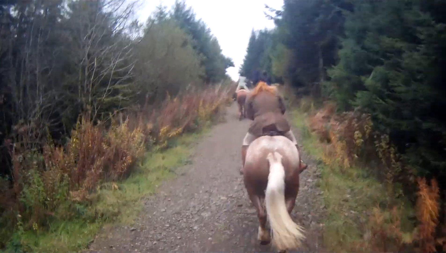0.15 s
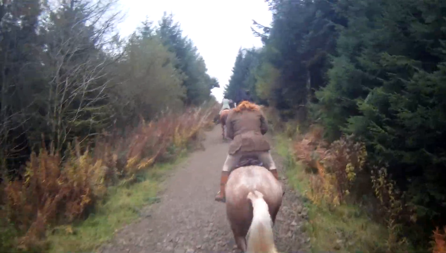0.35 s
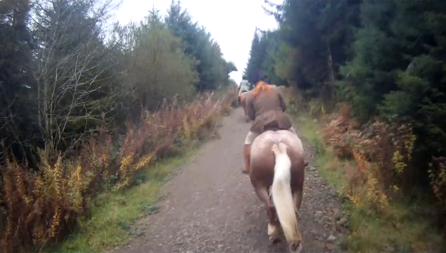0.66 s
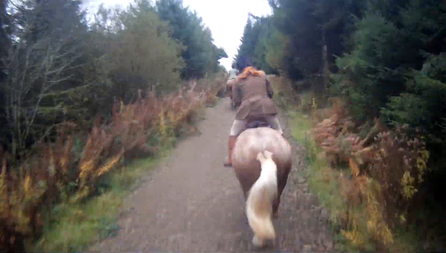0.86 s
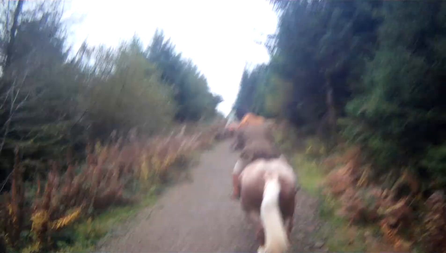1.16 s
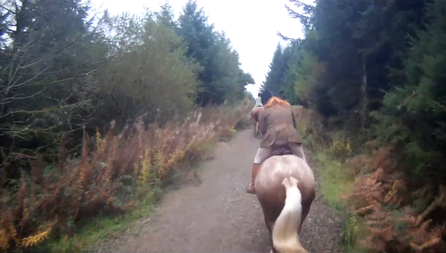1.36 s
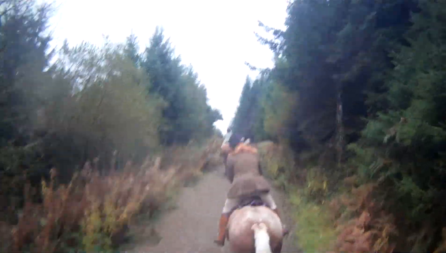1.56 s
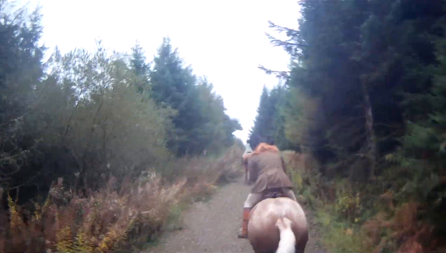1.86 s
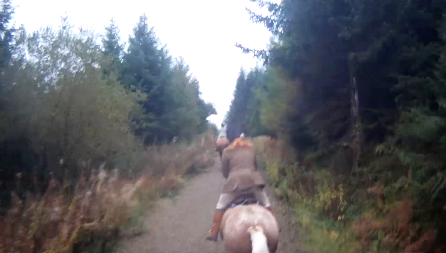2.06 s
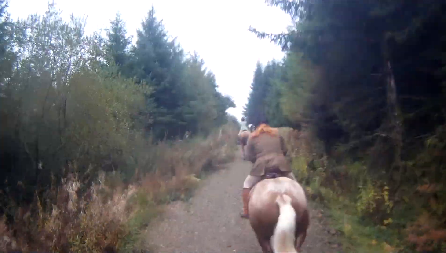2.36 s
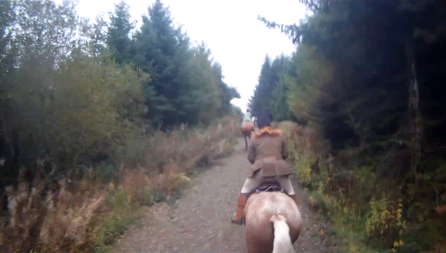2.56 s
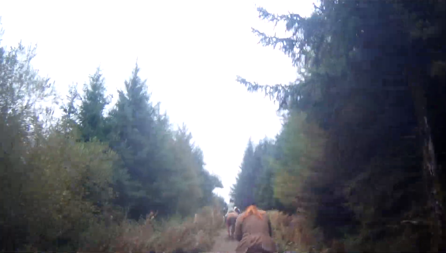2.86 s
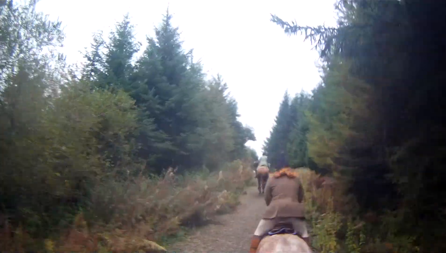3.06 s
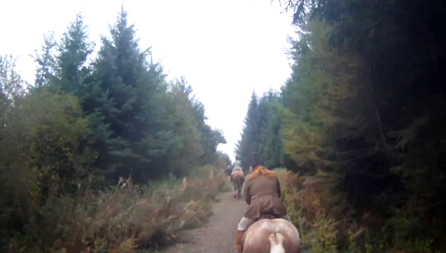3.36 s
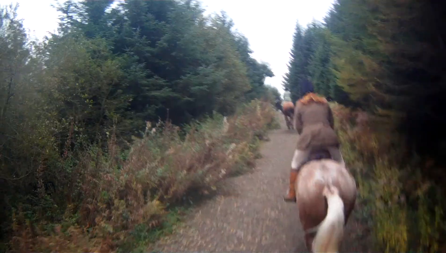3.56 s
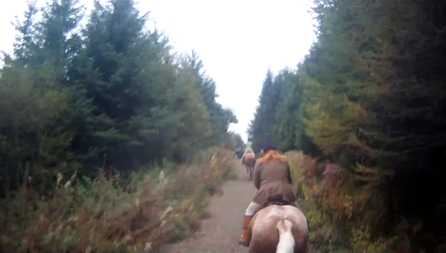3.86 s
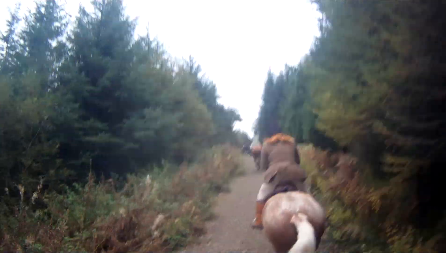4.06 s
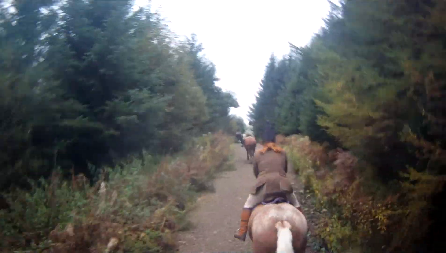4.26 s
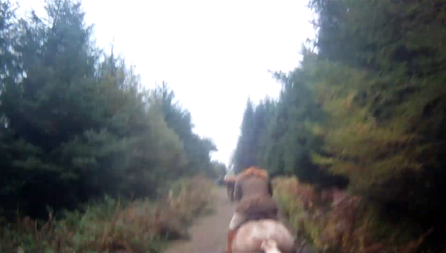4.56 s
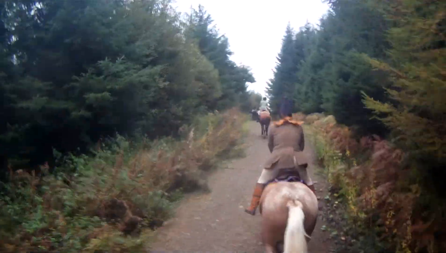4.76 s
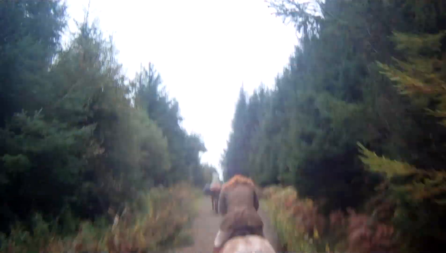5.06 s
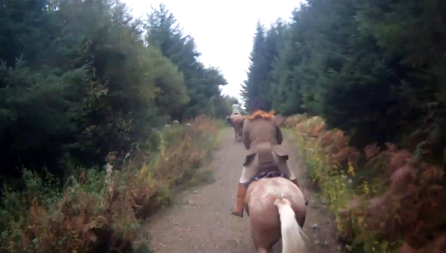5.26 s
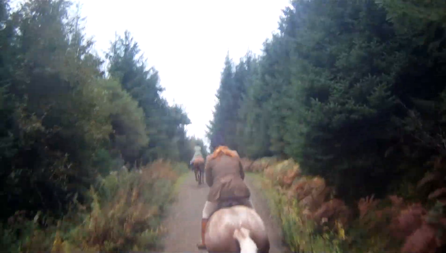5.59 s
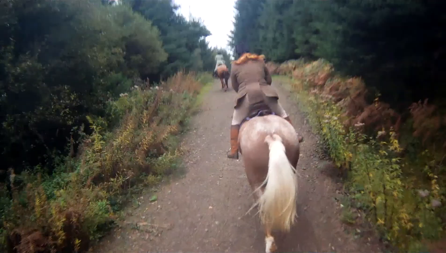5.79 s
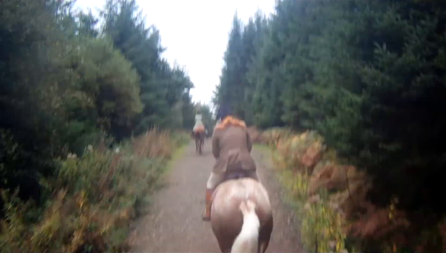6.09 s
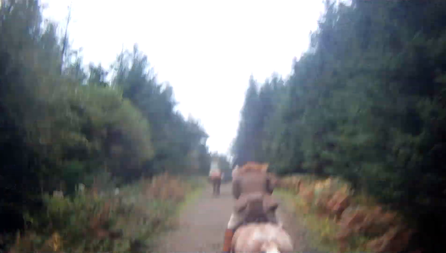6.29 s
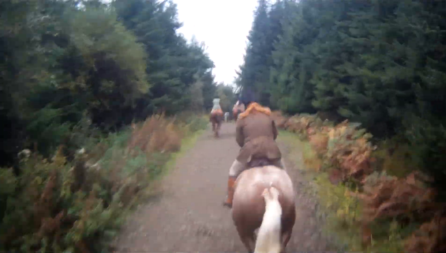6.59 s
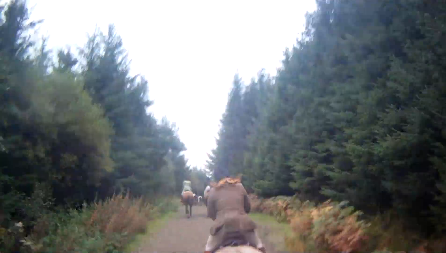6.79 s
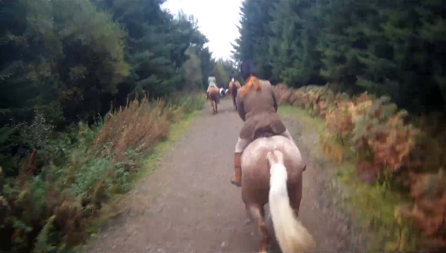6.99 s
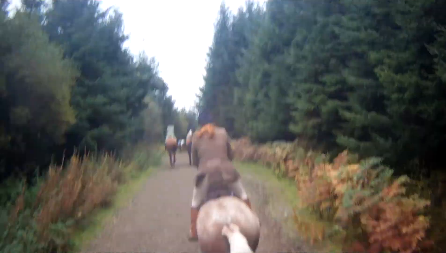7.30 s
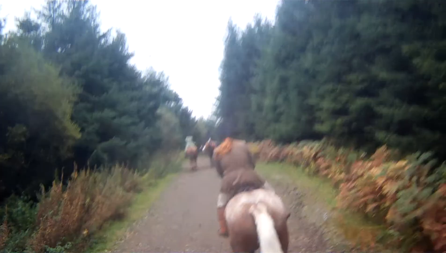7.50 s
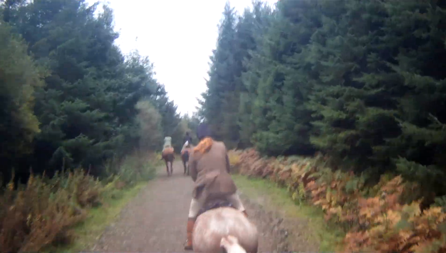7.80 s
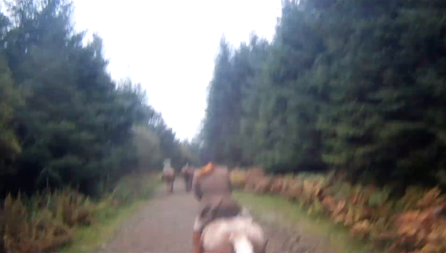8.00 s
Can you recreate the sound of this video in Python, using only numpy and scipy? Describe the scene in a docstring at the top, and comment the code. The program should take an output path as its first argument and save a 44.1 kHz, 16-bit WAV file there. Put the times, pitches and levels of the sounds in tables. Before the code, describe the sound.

Several horses canter on a gravel forest track. Hooves crunch in a dense, continuous, irregular run, each with a sharp snap and short spray of grit, some with a hollow clop. Loose stones hiss underneath. Dull thumps and small plastic rattles come from the microphone's case on a rider's helmet. Outdoors, dry, slightly boxy, with barely any wind.

```python
"""Horses canter along a gravel forest track, heard by one microphone in a plastic case on a rider's helmet.
Each hoof shapes random stone clicks by a snap, a burst and a weak tail; loose gravel hisses and spatters
between. Parallel resonances of the case colour both. The jolts of the stride excite damped modes of the
case on its mount, with a rattle of small touches. Band-limited noise gives a faint wind rumble and rustle."""
import sys
import numpy as np
from scipy import signal
from scipy.io import wavfile

SR = 44100
rng = np.random.default_rng(int(sys.argv[2]) if len(sys.argv) > 2 else 0)


def wrap_up_sound(samples):
    """Save the sound to the file named by the first command line argument, as 16-bit audio."""
    columns = np.atleast_2d(samples).T
    # keep every value between -1 and 1, then stretch to whole-number steps
    tamed = np.clip(columns, -1, 1)
    steps = np.round(tamed * 32767).astype(np.int16)
    wavfile.write(sys.argv[1], SR, steps)


N = 358974   # length in samples


def amp(db):
    """Level to amplitude: 20 dB is a factor of ten."""
    return 10 ** (np.asarray(db) / 20)


def rms_one(x):
    """Normalisation to unit effective value."""
    return x / np.sqrt(np.mean(x ** 2) + 1e-20)


def drift(rate):
    """Low-passed noise: a random wander of rms 1, with two equal poles at rate Hz."""
    step = 40   # samples between computed points
    r = np.exp(-2 * np.pi * rate * step / SR)
    noise = rng.standard_normal(N // step + 2002)
    slow = signal.lfilter([1], [1, -2 * r, r * r], noise)[2000:]   # drop the settling
    return np.interp(np.arange(N) / step, np.arange(len(slow)), rms_one(slow))


def resonance(x, hz, width_hz):
    """Forced resonance: a two-pole band with gain near 1 at its peak."""
    r = np.exp(-np.pi * width_hz / SR)
    zeros = (1 - r * r) / 2 * np.array([1, 0, -1])
    return signal.lfilter(zeros, [1, -2 * r * np.cos(2 * np.pi * hz / SR), r * r], x)


def ring(clicks, hz, t60):
    """Free damped vibration: a unit click starts a sine of initial height 1 that decays 60 dB in t60 s."""
    r, w = amp(-60 / (t60 * SR)), 2 * np.pi * hz / SR
    return signal.lfilter([0, np.sin(w)], [1, -2 * r * np.cos(w), r * r], clicks + 1e-18)


def stones(per_s, spread_db):
    """Random impulse process: clicks at random instants, a few much louder than the rest; rms 1."""
    sizes = amp(spread_db * np.minimum(rng.exponential(1, N), 5)) * rng.choice([-1, 1], N)
    return rms_one(sizes * (rng.random(N) < per_s / SR))


# course of the rustle, which the wind follows too: t/s, level/dB
RUSTLE_COURSE = [(0.0, -70), (1.7, -68), (1.92, -64), (6.35, -64.5), (6.55, -61), (8.14, -61.5)]


def rustle_level():
    """Piecewise-linear level: the background is interpolated in dB between the listed times."""
    return np.interp(np.arange(N) / SR, *np.transpose(RUSTLE_COURSE))


# edges of the rustle band: lower f/Hz, upper f/Hz
RUSTLE_BAND_HZ = (31, 430)


def air(level_db):
    """Band-limited impulse noise: sparse clicks through a low band make a faint, uneven rustle."""
    band = signal.butter(2, RUSTLE_BAND_HZ, "band", fs=SR, output="sos")
    rustle = signal.sosfilt(band, stones(1500, spread_db=4.5))
    return amp(level_db + 2.2 * drift(6.2)) * rms_one(rustle)


WIND_DB = -7   # re the rustle


def wind(level_db, top_hz=55.6):
    """Pressure fluctuation on the microphone port: narrow low noise with a lumpy level."""
    band = signal.butter(2, [30, top_hz], "band", fs=SR, output="sos")
    low = signal.sosfilt(band, rng.standard_normal(N))
    return amp(level_db + WIND_DB + 5.1 * drift(12.0)) * rms_one(low)


# knocks of the case on its mount: t/s, body level/dB, click level/dB re body, rattle level/dB re body
CASE_KNOCKS = [(0.179, -49.5, -9, -2.5), (0.262, -38.5, -5, -16), (0.483, -56, -12, -6),
               (0.776, -29.5, 7, -11.5), (0.997, -58, -14, -6), (1.334, -32, 3.5, -10), (1.914, -55, 2, -3),
               (1.966, -51, -23, -15), (2.085, -52, -12, 6), (2.126, -42.5, 13, -6),
               (2.136, -28.5, -2, -14), (2.475, -43.5, -10, -8.5), (2.655, -44.5, -2, -14),
               (2.727, -33.5, 0.5, -8), (2.94, -56, 8, -12), (3.128, -27, 10, -15.5), (3.236, -45, 3, 0),
               (3.307, -25.5, 12.5, -13), (3.627, -32.5, 7.5, -10.5), (3.789, -50, 2, -6),
               (3.825, -48, 5, -9), (3.859, -48, 2, 1.5), (4.243, -41, -5, -4), (4.36, -33.5, 8.5, -6.5),
               (4.4391, -30, 16, -12.5), (4.455, -36, -6, -14), (4.477, -44.5, 4, -3.5),
               (4.787, -45.5, -3, -8.5), (4.948, -53, -17, -14), (5.008, -36, -2, -15.5),
               (5.274, -57, 4, 2), (5.367, -28.5, 9, -13), (5.55, -58, -15, -17), (5.895, -31.5, 8, -15.5),
               (6.37, -58, -10, -6), (6.533, -35.5, 6.5, -8), (6.655, -52, -17, -2), (6.718, -30.5, -3, -9),
               (6.969, -48, 14.5, -5), (7.0424, -28.5, 13.5, -14.5), (7.263, -56, -4, 3),
               (7.654, -40.5, -20, -3), (7.855, -55, -1, -5)]
# modes of the case on its mount: f/Hz, level/dB, t60/s
MOUNT_MODES = [(40.3, -0.5, 0.46), (101.6, 17.5, 0.13), (265, 7.5, 0.03), (426.3, 6.5, 0.037),
               (776, 4.5, 0.032), (897, -1.5, 0.034), (1077, -0.5, 0.029), (1280, 5.5, 0.013),
               (1574, 7.5, 0.013), (2540, 4.5, 0.01), (3150, 8, 0.0051)]
# parts of the push, one f/Hz each: sway, boom, body from, body to, click, crack
PUSH_HZ = (42, 99, 245, 442, 1575, 2650)
SWAY_DB, SWAY_PER_RATTLE = 8.5, 2.4   # a loose, rattling case also sways
# the boom grows more slowly than the knock; a tight case booms more
BOOM_DB, BOOM_PER_BODY, BOOM_PER_RATTLE = -29.5, -0.31, -0.31
UNEVEN_DB, UNEVEN_PER_RATTLE = 8, 0.25   # a tight case rings less unevenly than a loose one
CRACK_DB = -8.5   # re click


def knocks(rattle_s=0.013, lag_s=0.0035):
    """Modal excitation: a short push strikes every mode of the mount, amid small touches as the case shakes."""
    s, level_db, click_db, rattle_db = np.transpose(CASE_KNOCKS)
    sway_db = SWAY_DB + SWAY_PER_RATTLE * np.minimum(rattle_db, -3)
    boom_db = BOOM_DB + BOOM_PER_BODY * level_db + BOOM_PER_RATTLE * rattle_db
    spectra = np.transpose([sway_db, boom_db, 0 * s, 0 * s, click_db, click_db + CRACK_DB])
    uneven_db = np.maximum(UNEVEN_DB + UNEVEN_PER_RATTLE * rattle_db, 0)
    scatter_db = uneven_db[:, None] * rng.standard_normal((len(s), len(MOUNT_MODES)))
    at = np.round(s * SR).astype(int)
    shaking = signal.windows.gaussian(round(8 * rattle_s * SR), rattle_s * SR)
    touches = stones(900, spread_db=6.0) * amp(-28.5)
    out = np.zeros(N)
    for k, (hz, mode_db, t60) in enumerate(MOUNT_MODES):
        share_db = [np.interp(np.log(hz), np.log(PUSH_HZ), spectrum) for spectrum in spectra]
        push = amp(level_db + share_db + mode_db)
        clicks, shake = np.zeros((2, N))
        clicks[at] = push * amp(scatter_db[:, k])
        shake[at + round(lag_s * SR)] = push * amp(rattle_db)   # the shaking peaks just after the push
        clicks += touches * signal.fftconvolve(shake, shaking, "same")
        polarity = (-1) ** max(k, 3)   # slow modes start together, fast ones in turns
        out += polarity * ring(clicks, hz, t60)
    blunt_contact = signal.butter(2, 6500, fs=SR, output="sos")
    return signal.sosfilt(blunt_contact, out)


# limits of the hoof's colour: top of the clop f/Hz, bottom of the crunch f/Hz
CLOP_CRUNCH_HZ = (950, 2400)
# a centre an octave above the usual one tilts the crunch by TILT_DB an octave;
# it also falls by FOCUS_DB an octave from the centre, growing as the square
USUAL_HZ, TILT_DB, FOCUS_DB = 4680, 8, 3.5
PEAK_DB, PEAK_OCTAVES = 2, 0.13   # each crunch favours the resonance nearest its centre


def hoof_colour(hz, clop_db, centre_hz):
    """Spectral envelope: the clop's level low down, blending into a tilted and peaked crunch above."""
    crunch_hz = max(hz, CLOP_CRUNCH_HZ[1])
    above_usual, above_centre = np.log2(crunch_hz / np.array([USUAL_HZ, centre_hz]))   # octaves
    crunch_db = TILT_DB * np.log2(centre_hz / USUAL_HZ) * above_usual - FOCUS_DB * above_centre ** 2
    crunch_db += PEAK_DB * np.exp(-(above_centre / PEAK_OCTAVES) ** 2)
    return np.interp(np.log(hz), np.log(CLOP_CRUNCH_HZ), [clop_db, crunch_db])


# hooves in the stones: t/s, crunch level/dB, clop level/dB re crunch, crunch centre f/Hz, t60/s
HOOF_STEPS = [(0.0258, -20, 12.5, 4500, 0.023), (0.0727, -12.5, -1, 3800, 0.1),
              (0.161, -17.5, 2, 5600, 0.039), (0.194, -13.5, -5, 3700, 0.04), (0.270, -9, -20, 5300, 0.033),
              (0.4826, -11.5, 0, 3700, 0.063), (0.537, -20, 0.5, 5630, 0.19), (0.597, -12, -7, 4100, 0.14),
              (0.691, -19.5, -8, 4360, 0.03), (0.716, -13.5, -3, 5200, 0.032), (0.735, -16, 0, 4000, 0.074),
              (0.927, -23.5, -2, 4350, 0.033), (0.968, -24, 4, 4470, 0.031),
              (0.9978, -18.5, 9.5, 2460, 0.054), (1.0274, -7, -22, 6600, 0.057),
              (1.097, -24, -17, 5530, 0.013), (1.112, -14.5, 1, 5740, 0.079), (1.137, -7.5, 2, 3600, 0.075),
              (1.191, -17.5, -8, 3250, 0.022), (1.259, -17, -1, 5800, 0.13), (1.284, -9, -0.5, 5830, 0.055),
              (1.452, -11.5, -7, 3500, 0.0086), (1.5123, -15, -23, 5440, 0.016),
              (1.56, -11.5, -11.5, 4500, 0.036), (1.6648, -14.5, -4, 4220, 0.08),
              (1.677, -11.5, -3, 5470, 0.15), (1.721, -21, 2.5, 4830, 0.14), (1.7934, -17, 0.5, 3560, 0.11),
              (1.86, -13.5, -2.5, 3570, 0.073), (1.995, -24, -2, 2660, 0.13),
              (2.05, -19.5, -25, 4700, 0.065), (2.068, -18.5, -2.5, 4270, 0.058),
              (2.108, -15.5, 3.5, 3500, 0.16), (2.179, -17.5, -1, 4400, 0.11),
              (2.223, -8.5, -9, 5900, 0.049), (2.25, -13, -21, 3600, 0.031), (2.262, -18.5, 5, 5030, 0.073),
              (2.28, -16, 2, 7140, 0.086), (2.344, -25, 3.5, 3260, 0.022), (2.436, -6.5, -1.5, 6130, 0.04),
              (2.543, -25.5, -5, 3950, 0.11), (2.600, -26, 10.5, 4000, 0.053),
              (2.612, -15.5, -5, 4370, 0.027), (2.644, -5.5, -16.0, 3600, 0.031),
              (2.726, -18, 15, 3370, 0.069), (2.744, -15, -9, 4600, 0.081), (2.8262, -16, -18, 6100, 0.017),
              (2.844, -9.5, -9, 6750, 0.076), (2.889, -24, 8, 4500, 0.036),
              (2.917, -21.5, 1.5, 3500, 0.076), (3.008, -37, -21, 6300, 0.049),
              (3.025, -14.5, -2, 5100, 0.081), (3.105, -24, -12, 5800, 0.033),
              (3.165, -17, -6, 4100, 0.046), (3.172, -15, -9.0, 4200, 0.056), (3.218, -18, 2, 2800, 0.049),
              (3.288, -8, -2, 5400, 0.06), (3.302, -13.5, 7, 2620, 0.051), (3.357, -11.0, 3.5, 4700, 0.015),
              (3.417, -14.5, 3.5, 5300, 0.12), (3.436, -25, 8, 4820, 0.073), (3.483, -16, -25, 5700, 0.041),
              (3.71, -8, -8.5, 3020, 0.026), (3.735, -14, 5.5, 3830, 0.03), (3.815, -12, -2.5, 5400, 0.082),
              (3.978, -14.5, -3.5, 4570, 0.13), (4.1118, -14.5, -21, 3420, 0.029),
              (4.146, -14.5, 6, 5600, 0.027), (4.234, -15.5, -5.5, 4000, 0.14),
              (4.348, -12, 5, 4100, 0.094), (4.361, -13.5, 0, 4500, 0.026),
              (4.4404, -3.5, 13.5, 2760, 0.012), (4.4435, -27, 20, 2800, 0.036),
              (4.491, -11, 1, 3100, 0.02), (4.543, -17.5, 0.5, 7160, 0.071), (4.573, -22, 3, 6400, 0.032),
              (4.659, -16, -2, 4040, 0.048), (4.667, -22, -44, 4600, 0.024),
              (4.71, -10.5, 4.5, 5300, 0.035), (4.774, -8, -10, 4400, 0.061), (4.82, -22, 4, 2700, 0.029),
              (4.878, -13.5, -7, 7700, 0.062), (5.008, -22, 7.5, 5140, 0.14),
              (5.130, -17.5, 3.5, 6800, 0.082), (5.1808, -13.5, -15, 5370, 0.17),
              (5.293, -14.5, -4.5, 5330, 0.13), (5.419, -12.5, -3, 4960, 0.07),
              (5.449, -4.5, -4, 5300, 0.011), (5.601, -22, 4.5, 4360, 0.026),
              (5.703, -16, 8.5, 4300, 0.053), (5.812, -19, -6, 4320, 0.15), (5.8354, -7, -7, 5500, 0.054),
              (5.935, -16.5, -4, 5370, 0.075), (6.035, -7.5, 0.5, 4800, 0.0099),
              (6.056, -15.5, 1, 6500, 0.025), (6.1515, -20, -8, 6700, 0.096), (6.264, -18, 5, 7040, 0.053),
              (6.293, -18, 8, 3600, 0.058), (6.364, -6.0, -4, 3300, 0.036), (6.409, -16, 4.5, 3380, 0.026),
              (6.4467, -14, -6.5, 4520, 0.1), (6.712, -20.5, 14.5, 3140, 0.078),
              (6.766, -8, -9.5, 4200, 0.014), (6.842, -15.5, 4, 7500, 0.11),
              (6.884, -12.5, -8, 4500, 0.049), (6.988, -7, -10, 4800, 0.1), (7.1217, -18, 6, 4000, 0.055),
              (7.289, -34, -6, 4500, 0.011), (7.303, -27, 9, 5500, 0.044), (7.418, -15, 3.5, 4260, 0.074),
              (7.536, -12, 1, 4660, 0.1), (7.573, -6.5, 0.5, 5940, 0.025), (7.643, -26, 14, 6500, 0.16),
              (7.863, -25, 13, 4100, 0.1), (7.903, -13, -0.5, 4000, 0.027), (7.986, -15, 4.5, 5740, 0.088)]
# what the case and its port let through: f/Hz, width f/Hz, level/dB
CASE_RESONANCES = [(406, 330, -24.5), (856, 530, -13), (946.3, 101, -3), (1103, 51, -9.5),
                   (1143, 602, -10.5), (1560, 110, -10), (1950, 1080, -12.5), (2668, 353, -6.5),
                   (3227, 530, -12.5), (3970, 540, -9), (4360, 520, -10), (4945, 710, -7.5),
                   (5372, 990, -13), (6770, 540, -12), (8115, 590, -17), (10700, 1200, -32.5)]
LIGHT_COUNT, LIGHT_DB, LIGHT_T60_S = 8, -24, 0.11   # light steps of farther horses fall at random
BED_DB, BED_RISE_DB_PER_S = -32.5, 0.335   # loose gravel under all the horses, before the case


def gravel(snap_db=5.5, snap_t60=0.0088, tail_db=-31.5, tail_t60=0.69, scatter_db=3.0, rise=0.026):
    """Granular excitation of parallel resonances: hooves crush stones and throw grit over a loose bed."""
    t = np.arange(round(.3 * SR)) / SR
    light = [(when * N / SR, LIGHT_DB, 0, USUAL_HZ, LIGHT_T60_S) for when in rng.random(LIGHT_COUNT)]
    steps = np.array(HOOF_STEPS + light)
    own_db = scatter_db * rng.standard_normal((len(steps), len(CASE_RESONANCES)))
    snap = amp(snap_db - 60 * t / snap_t60) * (1 - np.exp(-t / 0.00057))
    bursts = []
    for t60 in np.maximum(steps[:, -1], .004):
        fade = amp(-60 * t / t60) + amp(tail_db - 60 * t / tail_t60)   # crunch and thrown grit
        bursts.append((1 - np.exp(-t / (rise * t60))) * fade)   # a long crunch also sinks in more slowly
    clumps = amp(3.08 * drift(197))   # stones give way in clumps
    crushed = [stones(9000, spread_db=2.5) for _ in range(2)]
    loose = [stones(14000, spread_db=4.5) for _ in range(2)]
    pebbles = amp(-9.5) * stones(400, spread_db=4.5)   # single ones stand out of the dense spatter
    bed_db = BED_DB + BED_RISE_DB_PER_S * np.arange(N) / SR + 2.62 * drift(31)
    out = np.zeros(N)
    for k, (hz, width_hz, case_db) in enumerate(CASE_RESONANCES):
        blows, snaps = np.zeros((2, N + len(t)))
        for (s, level_db, clop_db, centre_hz, _), burst, step_db in zip(steps, bursts, own_db[:, k]):
            at = round(s * SR)
            gain = amp(level_db + hoof_colour(hz, clop_db, centre_hz) + step_db)
            blows[at:at + len(t)] += gain * burst
            snaps[at:at + len(t)] += gain * snap
        bed_gain = amp(bed_db + 2.62 * drift(29.5))
        pebble_colour = amp(4.74 * rng.standard_normal(N))   # each pebble has a colour of its own
        bed = bed_gain * (loose[k % 2] + pebbles * pebble_colour)
        uneven = clumps * amp(2.12 * drift(124))
        hooves = (snaps[:N] + uneven * blows[:N]) * crushed[k % 2]
        ringing = resonance(hooves + bed, hz, width_hz)
        out += amp(case_db) * resonance(ringing, hz, 2.14 * width_hz)   # once more, for steep skirts
    port = signal.butter(2, 11500, fs=SR, output="sos")   # the port muffles the top
    return signal.sosfilt(port, out)


def scene():
    """Superposition: all sources add at one microphone, which feeds both channels."""
    rustle_db = rustle_level()
    heard = gravel() + knocks() + wind(rustle_db) + air(rustle_db)
    return np.array([heard, heard])


OVERLOAD = 0.66   # height above which the capsule flattens
CUTOFF_HZ = 15250
HISS_DB = -67.5   # faint steady noise, alike in both channels
SIDE_DB = -84.5   # white noise, before differencing brightens it


def record(dry):
    """Bent peaks and band limits: overload, steady hiss, a trace of stereo difference, low and high cuts."""
    excess = np.maximum(np.abs(dry) - OVERLOAD, 0)
    bent = dry - np.sign(dry) * .8 * excess   # a fifth of the slope remains
    hiss = amp(HISS_DB) * rng.standard_normal(N)
    side = amp(SIDE_DB) * np.diff(rng.standard_normal((2, N + 1)))   # sets the channels slightly apart
    top_cut = signal.ellip(10, .5, 60, CUTOFF_HZ, fs=SR, output="sos")
    rumble_cut = signal.butter(2, 33, "high", fs=SR, output="sos")
    return signal.sosfilt(np.vstack([top_cut, rumble_cut]), bent + hiss + side)


dry = scene()
out = record(dry)
wrap_up_sound(out)
```